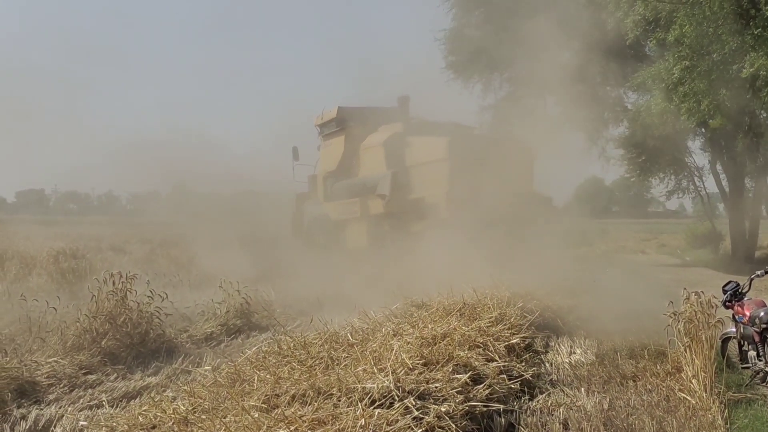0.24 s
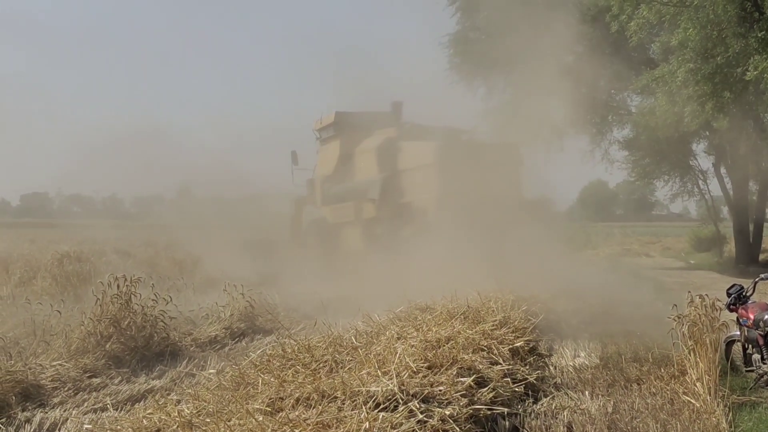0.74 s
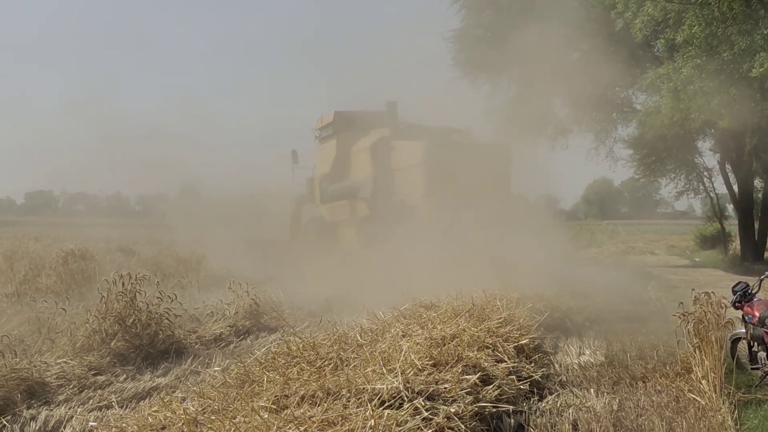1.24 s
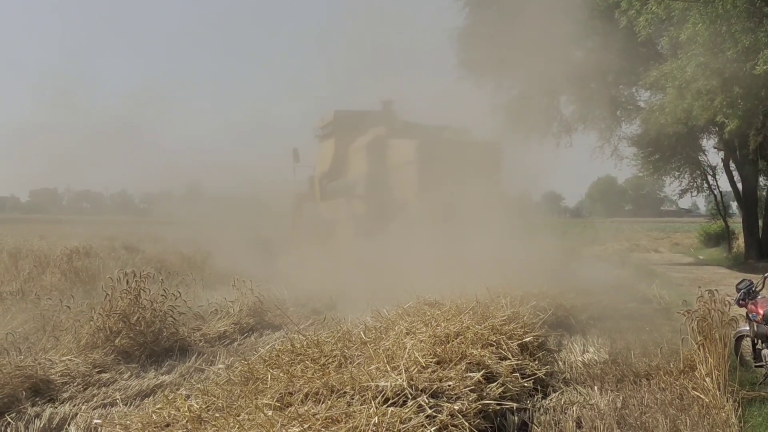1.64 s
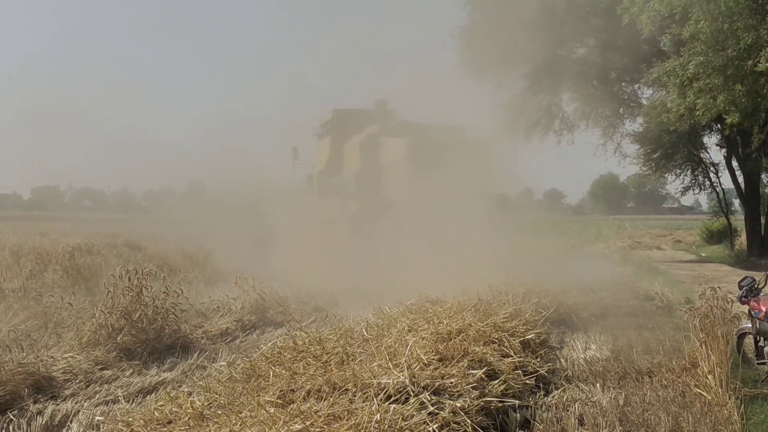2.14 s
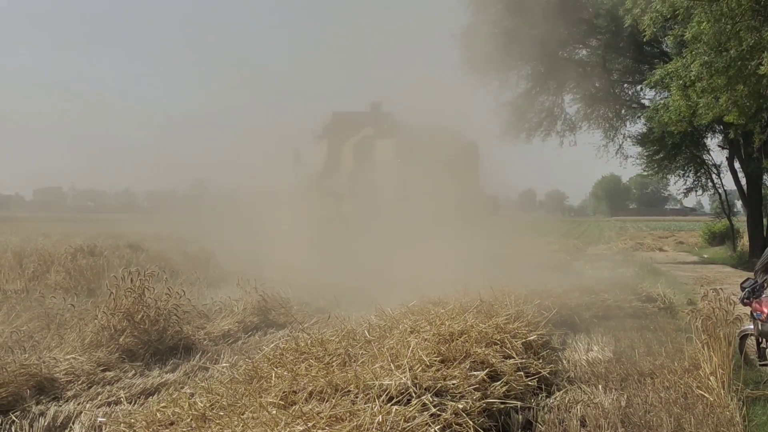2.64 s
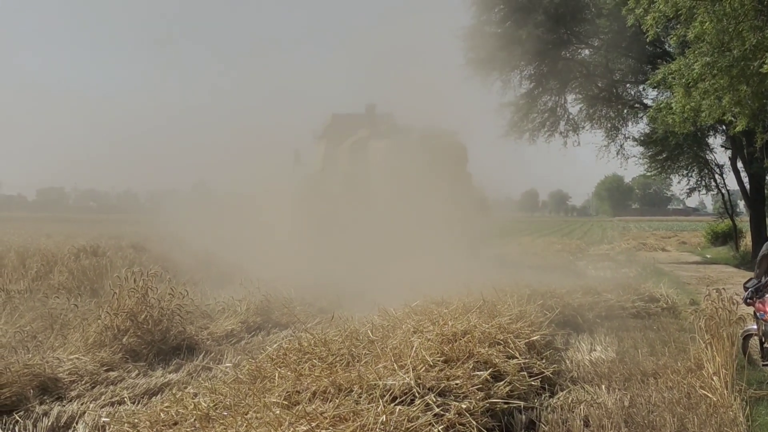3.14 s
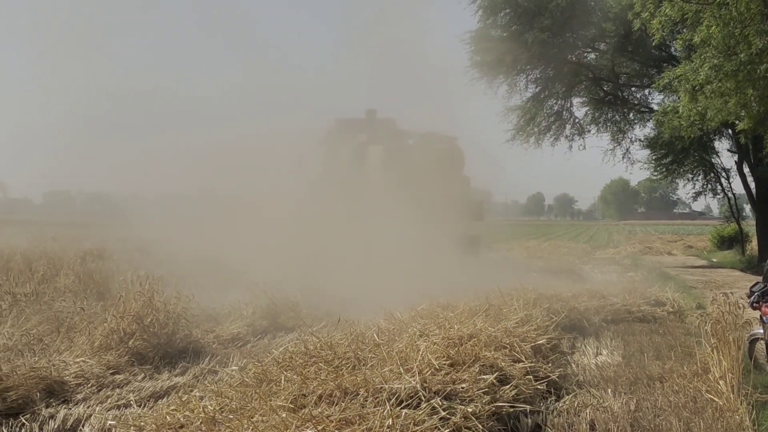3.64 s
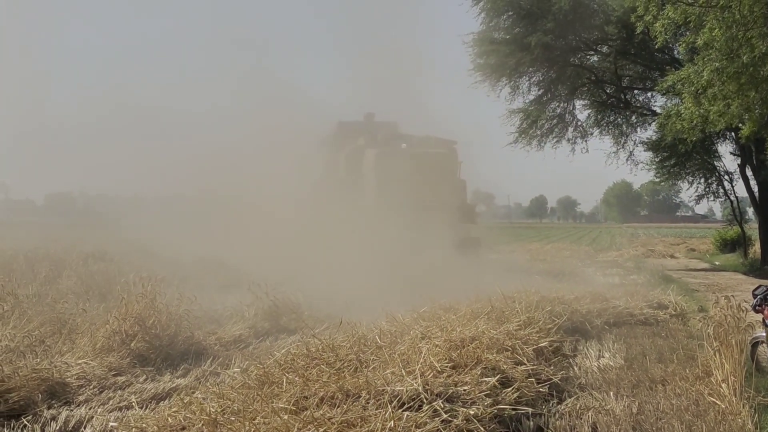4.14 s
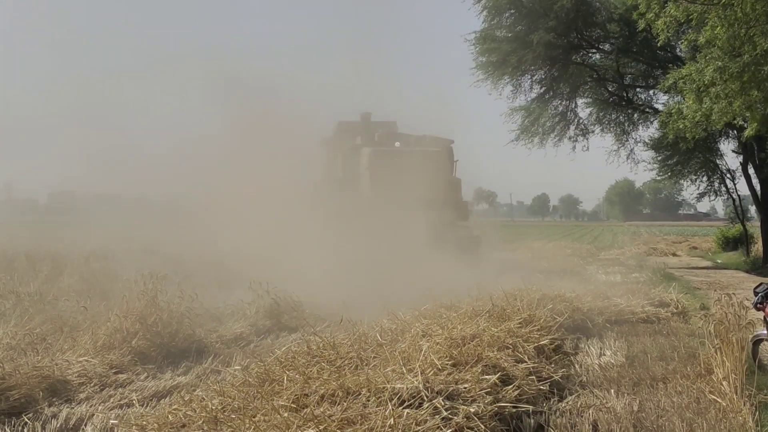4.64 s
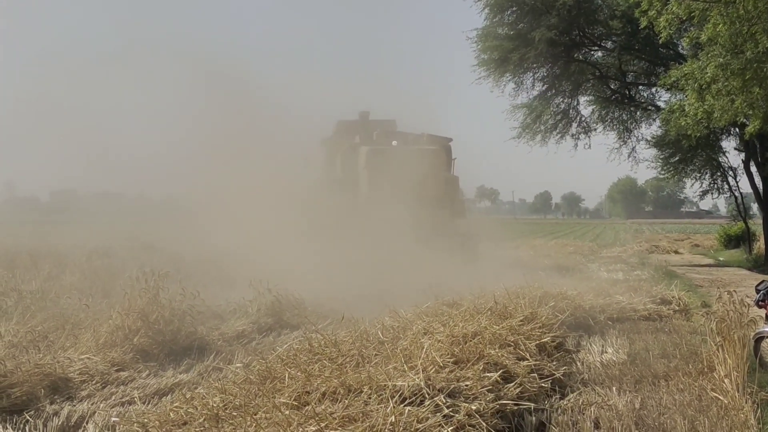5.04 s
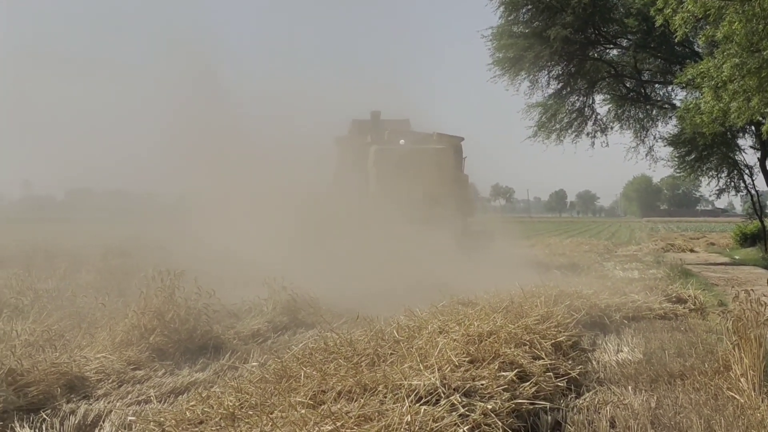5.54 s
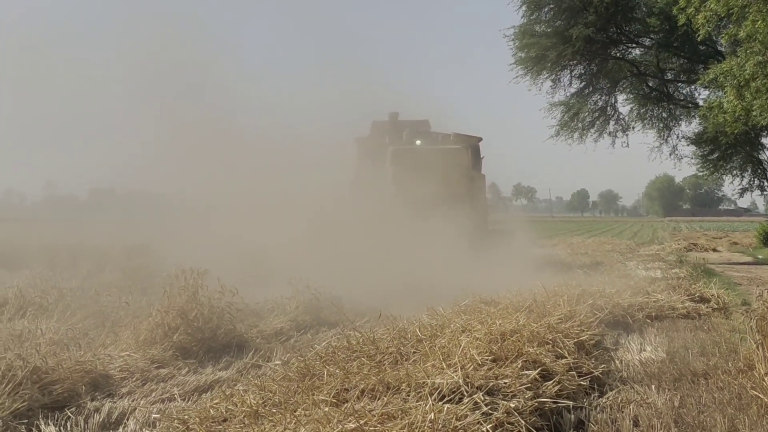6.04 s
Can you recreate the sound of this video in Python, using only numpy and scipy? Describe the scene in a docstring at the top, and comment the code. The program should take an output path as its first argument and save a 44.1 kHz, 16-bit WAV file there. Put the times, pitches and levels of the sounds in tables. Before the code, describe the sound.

A combine harvester works at moderate distance, heard by a stereo microphone in the open. The engine's fast, even firing purrs low and pulses slowly in strength, with knocking casing, rattling panels and a hard raspy edge. The thresher's deep drone rises and sinks over rumbling air. High whistles and chirps are strongest early and return weaker later. Fine dry straw hiss continues throughout, and everything fades gently as the machine moves off.

```python
"""A six-cylinder diesel combine harvester hums and clatters slowly away across a dry wheat field.
Its firing note beats against a near tone of the machinery; noise bursts ring the block, casing and panels,
and a thin whistle pulses with the firings. The threshing gear drones on its own shaft, over a rumble
of air and a hiss of straw, both filtered noise. A breeze and two light gusts brush the microphone."""
import sys
import numpy as np
from scipy import signal
from scipy.fft import rfft, irfft, next_fast_len
from scipy.io import wavfile
from scipy.ndimage import map_coordinates

SR = 44100
rng = np.random.default_rng(int(sys.argv[2]) if len(sys.argv) > 2 else 0)


def materialize(psi):
    """Save the field psi as 16-bit PCM at rate SR to the path in sys.argv[1].

    A 1-D psi becomes a single channel; in a 2-D psi each row is a channel.
    """
    bounded = np.clip(np.atleast_2d(psi).T, -1, 1)
    quanta = np.round(bounded * 32767).astype(np.int16)
    wavfile.write(sys.argv[1], SR, quanta)


N = 277389
T = np.arange(N) / SR
SIZE = next_fast_len(N, real=True)

CYCLE_HZ, CYCLE_OFFSET_TURNS = 17.63, -0.158  # nominal four-stroke rate, and where the count begins
# The engine sags under load, picks up and settles: start_s, cycle_hz (four-stroke cycles a second)
ENGINE_SPEED = [(0, 17.63), (.7, 17.62), (1.6, 17.57), (2.4, 17.57), (3.7, 17.745), (4.4, 17.63),
                (5.2, 17.55), (6.29, 17.62)]


def engine_cycle():
    """Four-stroke cycles run so far: the integral of the engine speed, with a slight unsteadiness."""
    cycle_hz = np.interp(T, *np.transpose(ENGINE_SPEED))
    return CYCLE_OFFSET_TURNS + np.cumsum(cycle_hz) / SR + 0.0014 * walk(2.84)


# Strength of each cylinder against the others, in firing order: level_db
CYLINDERS = [-10, -9, -6.5, -8.5, -6, -7.5]


def firings(cycle, sharp, scatter_db, lean=0.58):
    """One puff a firing, quick to rise and slower to die; each cylinder has its own strength."""
    place = cycle * len(CYLINDERS)
    k = np.round(place).astype(int)
    scatter = scatter_db * np.tanh(rng.standard_normal(1024))
    size_db = np.take(CYLINDERS, k, mode="wrap") + scatter[k]
    angle = 2 * np.pi * place
    return unit(undb(size_db) * np.exp(sharp * np.cos(angle + lean * (1 + np.cos(angle)))))


NOTE_DB = -21  # firing note, before its easing-in, its beat and the distance
NOTE_EASE_DB, NOTE_EASE_S = -4.5, 0.6  # softer at first, firming up as the engine takes the load
BEAT_DB = -7  # near tone, against the firing note
LOPE_ORDER, LOPE_DB, LOPE_FADE_DB_PER_S = 9, -33.5, 0.4  # multiple of the cycle, rms at the start
# Lulls in the slow beat of the firing note: lull_s
LULLS = [-.3, .58, 2.09, 3.9, 5.44, 7.1]
# Engine hum on multiples of the four-stroke cycle: order (multiple), level_db (rms)
ENGINE_ORDERS = [(7, -41), (11, -46.5), (12, -47), (13, -60), (25, -50.5), (26, -51.5), (27, -51),
                 (33, -65), (46, -59.5), (50, -51), (51, -47.5), (63, -60.5), (87, -59)]


def exhaust(cycle):
    """The firing note beats with a near tone of the machinery; uneven cylinders add a lope and side orders."""
    beat_turns = np.interp(T, LULLS, np.arange(len(LULLS)))
    beat = 1 - undb(BEAT_DB) * np.exp(-2j * np.pi * beat_turns)
    note = -np.sqrt(2) * np.real(beat * np.exp(2j * np.pi * len(CYLINDERS) * cycle))
    ease_db = NOTE_EASE_DB * np.exp(-T / NOTE_EASE_S)
    note = note * undb(NOTE_DB + ease_db + distance_db() + 0.07 * walk(5.7))
    lope_db = LOPE_DB - LOPE_FADE_DB_PER_S * T
    lope = tone(LOPE_ORDER * cycle + 0.1 * walk(6), lope_db, waver_db=4.0)
    orders = sum(tone(round(k) * cycle + 0.08 * walk(9), db, waver_db=2.0) for k, db in ENGINE_ORDERS)
    return note + lope + orders


def knocking(cycle, repeat):
    """A jumble of knocks, a share of which comes back on every engine cycle."""
    count = int(SR / CYCLE_HZ)
    pattern = map_coordinates(rng.standard_normal(count), [cycle % 1 * count], order=3, mode="grid-wrap")
    repeat = np.clip(repeat, 0, 1)
    return np.sqrt(repeat) * pattern + np.sqrt(1 - repeat) * rng.standard_normal(N)


CLATTER_DB = -26.5  # before the shaking and the distance
# Tone of the block and panels: pitch_hz, level_db (relative)
BODY = [(100, -44), (230, -9), (330, -8.5), (460, -3), (570, -2.5), (650, -8), (765, 0), (900, -6.5),
        (1010, -12), (1180, -7), (1450, -12.5), (1850, -17.5), (2300, -19), (6000, -65)]


def clatter(cycle, shaft):
    """Knocks ring the block and panels, harder at each firing and each turn of the drum."""
    knocks = spread(knocking(cycle, repeat=0.21))
    body = unit(colour(knocks, BODY)) * undb(CLATTER_DB + 0.5 * walk(9))
    firing_shake = 0.5 + 0.17 * firings(cycle, sharp=0.5, scatter_db=4.5)
    shake = firing_shake * throb(shaft, sharp=0.067, scatter_db=1.05)
    return (body + guard_plate(cycle)) * shake * undb(distance_db())


GUARD_HZ, GUARD_WIDTH_HZ = 1120, 240
GUARD_DB, GUARD_PEAK_S, GUARD_LENGTH_S = -39.5, 1.5, 1.4  # level before the shaking and the distance


def guard_plate(cycle):
    """A guard plate buzzes for a while: knocks through one resonance that wanders in pitch."""
    buzz = ring(knocking(cycle, repeat=0.33), GUARD_HZ + 25 * walk(2), GUARD_WIDTH_HZ)
    return buzz * undb(GUARD_DB) * swell(GUARD_PEAK_S, GUARD_LENGTH_S)


BOOM_HZ, BOOM_WIDTH_HZ, BOOM_DB = 781.4, 105, -37.5
BOOM_HOLD_S, BOOM_FADE_DB_PER_S = 2.1, 1.9  # holds its level, then fades


def boom(cycle, shaft):
    """The casing growls with the engine and throbs with the drum; its ring wanders a little in pitch."""
    knocks = knocking(cycle, repeat=0.54) * firings(cycle, sharp=0.34, scatter_db=1.0)
    knocks = knocks * throb(shaft, sharp=0.48, scatter_db=1.0)
    level_db = BOOM_DB - BOOM_FADE_DB_PER_S * np.maximum(T - BOOM_HOLD_S, 0)
    return ring(knocks, BOOM_HZ + 14 * walk(3), BOOM_WIDTH_HZ) * undb(level_db)


# The hardest knocks on the casing: start_s (before the lead), level_db (peak, before the gain), pitch_hz
CLONKS = [(0.332, -16, 824), (0.497, -24, 719), (1.544, -17, 754), (1.746, -16, 778), (2.823, -20, 856),
          (2.88, -13, 789), (3.043, -19, 837), (3.855, -21, 762), (4.354, -31, 756), (4.583, -21, 775),
          (4.824, -11.5, 797), (5.254, -16, 756)]


def clonks():
    """Single harder knocks stand out of the casing's growl as short pitched bursts."""
    return pings(CLONKS, rise_s=0.0047, lead_s=0.0022, gain_db=-9.5)


RASP_DB = -33.5  # at the starting distance
# Tone of the hard upper edge: pitch_hz, level_db (relative)
RASP = [(600, -50), (1500, -37), (1950, -8), (2120, -6.5), (2520, -4.5), (2900, -2.5), (3150, -1.5),
        (3700, 1.5), (4100, -7.5), (4700, -20.5), (5800, -33), (14000, -63)]


def rasp(cycle):
    """The hard upper edge of the diesel knock: noise pulsed by the firings, loudest on strong cylinders."""
    puffs = 6.5 + 1.4 * firings(cycle, sharp=1.1, scatter_db=12.0)
    return unit(colour(air() * puffs, RASP)) * undb(RASP_DB + distance_db() + 0.5 * walk(5.9))


# Sheet-metal resonances: pitch_hz, width_hz, level_db (between the bouts)
PANEL_MODES = [(2374, 180, -51.5), (3453, 123, -52.5), (3760, 170, -57), (4000, 110, -66)]
# Bouts of harder rattling: peak_s, length_s, then level_db of each of the four resonances
RATTLES = [(0.2, 0.42, -42.5, -57, -36.5, -60), (1.65, 1.07, -48, -36.5, -48, -44),
           (4.5, 2, -43, -43, -52, -48.5)]


def panels(cycle):
    """Loose panels sing in bouts: firing-pulsed noise through narrow sheet-metal resonances."""
    out = 0
    for k, (hz, width_hz, db) in enumerate(PANEL_MODES):
        sing = undb(db)
        for peak_s, length_s, *modes_db in RATTLES:
            sing = np.hypot(sing, undb(modes_db[k]) * swell(peak_s, length_s))
        taps = rng.standard_normal(N) * firings(cycle, sharp=0.58, scatter_db=2.3)
        out = out + ring(taps, hz + 18 * walk(3), width_hz) * sing * undb(walk(16))
    return out


SPELL_ATTACK_S, SPELL_RELEASE_S, SPELL_SAG_DB_PER_S = 0.26, 0.21, 0.5
SPELL_SAG_HZ, SPELL_SETTLE_S, SPELL_WAVER_HZ = 214, 0.71, 18  # slide down, its time constant, waver
RUSH_DB = 0  # rush of gas against the clear core
# Spells of whistling: start_s, length_s, level_db (core, before swell and sag), pitch_hz (at the start)
SPELLS = [(-.25, 0.47, -36, 3470), (.08, 1.73, -34, 3832), (3.6, 1.23, -42, 3786), (5.705, 0.23, -39, 3570)]


def whistle(cycle):
    """Gas squeezes through a narrow gap at each firing and whistles in spells, each sliding down as it tires."""
    out = 0
    for start_s, length_s, db, start_hz in SPELLS:
        age = np.maximum(T - start_s, 0)
        attack = np.minimum(age / SPELL_ATTACK_S, 1)
        release = np.exp(-np.maximum(age - length_s, 0) / SPELL_RELEASE_S)
        slide_hz = SPELL_SAG_HZ * (1 - np.exp(-age / SPELL_SETTLE_S))
        hz = start_hz - slide_hz + SPELL_WAVER_HZ * walk(9)
        puffs = 0.5 + firings(cycle, sharp=1.0, scatter_db=4.0)
        rush = ring(rng.standard_normal(N) * puffs, hz, width_hz=260)
        # the clear core slips out of step from puff to puff
        core = unit(puffs * np.sin(2 * np.pi * (np.cumsum(hz) / SR + 0.23 * walk(70))))
        level = undb(db - SPELL_SAG_DB_PER_S * age)
        out = out + (undb(RUSH_DB) * rush + core) * attack * release * level
    return out


# The sharpest chirps of the whistle: start_s (before the lead), level_db (peak, before the gain), pitch_hz
CHIRPS = [(0.2774, -23, 3690), (0.3296, -21, 3710), (0.385, -21, 3760), (0.5005, -21, 3700),
          (0.5566, -26, 3660), (0.7063, -25, 3770), (0.7267, -21.5, 3530), (0.7831, -19.5, 3740),
          (0.8964, -23, 3540), (0.9343, -24, 3680), (1.3224, -27, 3540), (1.4491, -26, 3570),
          (1.7464, -24, 3680), (1.8073, -22, 3660), (4.1859, -36, 3650), (4.2228, -32, 3640),
          (4.2991, -25, 3660), (4.3565, -29, 3580), (4.5835, -29, 3460), (4.6404, -22.5, 3580),
          (4.6504, -30, 3350), (4.6972, -28, 3640), (4.7536, -26, 3520), (5.0739, -27.5, 3470)]


def chirps():
    """Now and then a hard puff squeaks out above the whistle as a short pitched burst."""
    return pings(CHIRPS, rise_s=0.0026, lead_s=0.0012, gain_db=4.5)


SHAFT_HZ, SHAFT_AT_S = 35.52, 2.65  # speed, and when the shaft runs at it
SHAFT_OFFSET_TURNS, SHAFT_SAG_HZ_PER_S = 0.055, 0.0388


def drum_shaft():
    """Turns of the drum's shaft, which slowly loses speed in the crop and runs a little unevenly."""
    lost_turns = SHAFT_SAG_HZ_PER_S * (T - SHAFT_AT_S) ** 2 / 2
    uneven = 0.0027 * walk(5.1) + 0.0057 * walk(35)
    return SHAFT_OFFSET_TURNS + SHAFT_HZ * T - lost_turns + uneven


def throb(shaft, sharp, scatter_db):
    """One surge at each turn of the drum, each with its own strength."""
    scatter = scatter_db * np.tanh(rng.standard_normal(1024))
    size_db = scatter[np.round(shaft).astype(int)]
    return unit(np.exp(sharp * np.cos(2 * np.pi * shaft)) * undb(size_db))


DRUM_NOTE_ORDER = 4  # multiple of the shaft speed
# The drum's main note rising and sinking: start_s, level_db (rms)
DRUM_LEVEL = [(0, -24), (1.2, -28), (2, -27), (3.1, -28), (3.7, -31.5), (4.3, -24), (4.75, -29),
              (5.2, -24.5), (5.45, -30.5), (5.8, -25.5), (6.29, -29)]
# Threshing drone on multiples of the shaft speed: order (multiple), level_db (rms)
DRUM_ORDERS = [(2, -43), (6, -35.5), (8, -40.5), (10, -51)]


def drum(shaft):
    """The threshing drum drones on multiples of its shaft speed, under a main note that rises and sinks."""
    level = undb(np.interp(T, *np.transpose(DRUM_LEVEL)))
    out = np.sqrt(2) * np.cos(2 * np.pi * DRUM_NOTE_ORDER * shaft) * level
    for k, db in DRUM_ORDERS:
        line = tone(round(k) * shaft + 0.04 * walk(14), db, waver_db=1.9)
        out = out + line * undb(1.4 * walk(24))
    return out


# Belt-driven shafts and fans: pitch_hz, level_db (rms)
BELT_TONES = [(42.3, -56.5), (126.2, -42), (165.5, -44.5)]


def belts():
    """Belt-driven shafts and fans hum at steady pitches, wavering in level."""
    return sum(tone(hz * T + 0.034 * walk(2.28), db, waver_db=4.0) for hz, db in BELT_TONES)


# Tone of the churned air: pitch_hz, level_db (relative)
RUMBLE = [(20, -27), (48, -22), (70, -8), (92, -4), (108, -3), (127, 5), (142, -1), (160, 2), (178, -0.5),
          (215, -1), (260, -10.5), (330, -17), (450, -48)]
# Level of the rumble: start_s, level_db (rms)
RUMBLE_LEVEL = [(0, -27), (1.2, -26.7), (2.1, -28), (3.0, -29), (3.7, -28), (4.3, -30.5), (5.1, -29.7),
                (6.29, -31.5)]


def rumble():
    """The air that drum and fans churn: low filtered noise."""
    return unit(colour(air(), RUMBLE)) * undb(np.interp(T, *np.transpose(RUMBLE_LEVEL)))


STRAW_DB = -44  # at the start
THINS_S, THINNING_S, THIN_DB = 4.9, 0.17, 2.5  # the stream thins once: when, over how long, by how much
STRAW_FADE = 0.22  # share of the machine's fading, in dB, that the straw follows
# Tone of the straw: pitch_hz, level_db (relative)
STRAW = [(1000, -21), (3500, 7.5), (5000, 2), (5900, -2.5), (6900, 7), (7700, 5), (8500, 8), (9400, 4),
         (10600, -4.5), (13000, -3.5), (14500, -5.5), (15500, -27)]


def straw():
    """Dry stalks and chaff: a fine, restless hiss with sparse crackles, which thins out near the end."""
    size = undb(3.5 * np.minimum(rng.exponential(size=N), 3.5))
    struck = rng.random(N) < 100 / SR  # about 100 crackles a second
    crackle = struck * size * rng.standard_normal((2, N))
    stalks = air() + undb(-15) * unit(crackle)
    flow_db = STRAW_DB - THIN_DB * np.clip((T - THINS_S) / THINNING_S, 0, 1)
    return unit(colour(stalks, STRAW)) * undb(flow_db + STRAW_FADE * distance_db() + 0.88 * walk(21.8))


BREEZE_DB = -41
# Gusts on the microphone: peak_s, length_s, level_db
GUSTS = [(3.577, 0.4, -29), (4.624, .14, -40)]
# Tone of the wind: pitch_hz, level_db (relative)
WIND = [(20, -30), (50, -26), (85, -2), (140, -3), (200, -12.5), (300, -16.5), (500, -29), (900, -63),
        (2500, -75)]


def wind():
    """A light breeze and two gusts, each swelling and sinking, buffet each port with its own noise."""
    force = undb(BREEZE_DB + 3.2 * walk(4.0))
    for peak_s, length_s, db in GUSTS:
        force = np.hypot(force, undb(db) * swell(peak_s, length_s))
    return unit(colour(rng.standard_normal((2, N)), WIND)) * force * undb(1.6 * walk(3.8))


START_M, SPEED_M_S = 18, 1.47  # starting distance, and a walking pace


def distance_db():
    """Loss of level as the machine draws away: 6 dB for each doubling of distance."""
    return -20 * np.log10(1 + SPEED_M_S * T / START_M)


# Likeness of the two ports: pitch_hz, share (of the power common to both, 0 to 1)
COMMON = [(60, 1), (280, 0.99), (750, 0.99), (1150, 0.96), (1600, 0.81), (3000, 0.39), (4200, 0.46),
          (5200, 0.091), (8000, 0.14), (14000, .05)]


def spread(common):
    """Two ports hear the same bass and mostly unrelated treble."""
    share = np.clip(per_bin(COMMON), 0, 1)
    own = rfft(rng.standard_normal((2, SIZE)))
    return irfft(np.sqrt(share) * rfft(common, SIZE) + np.sqrt(1 - share) * own, SIZE)[..., :N]


def air():
    """White noise as it reaches the two ports."""
    return spread(rng.standard_normal(N))


def tone(turns, db, waver_db):
    """One line of a rotating part, wavering on its way through the open air."""
    level = np.sqrt(2) * undb(db + waver_db * walk(5))
    return level * np.sin(2 * np.pi * (turns + rng.random()))


def ring(x, hz, width_hz):
    """A resonance with steep skirts whose centre may move: shift down, low-pass, shift back up."""
    lowpass = signal.butter(2, width_hz / 2, fs=SR, output="sos")
    low = signal.sosfilt(lowpass, x * np.exp(-2j * np.pi * np.mean(hz) * T))
    return unit(np.real(low * np.exp(2j * np.pi * np.cumsum(hz) / SR)))


def pings(rows, rise_s, lead_s, gain_db):
    """Short pitched bursts, quick to rise and slower to die: one a row, starting lead_s early."""
    out = 0
    for start_s, peak_db, hz in rows:
        age = np.clip((T - start_s + lead_s) / rise_s, 0, 20)
        burst = (age * np.exp(1 - age)) ** 2
        out = out + undb(peak_db + gain_db) * burst * np.sin(2 * np.pi * hz * T)
    return out


def swell(peak_s, length_s):
    """A smooth rise and fall around peak_s, 1 at the top."""
    return np.exp(-2 * ((T - peak_s) / length_s) ** 2)


def walk(rate):
    """Smooth chance of spread about 1 that changes about rate times a second."""
    knots = rng.standard_normal(1024)
    return map_coordinates(knots, [T * rate], order=3, mode="wrap")


def undb(db):
    """Decibels to gain."""
    return 10 ** (np.asarray(db) / 20)


def unit(x):
    """Scale to rms 1."""
    return x / np.sqrt(np.mean(np.abs(x) ** 2))


def per_bin(points):
    """(Hz, value) points joined on a log-frequency axis."""
    hz, value = np.transpose(points)
    bins_hz = np.maximum(np.fft.rfftfreq(SIZE, 1 / SR), 1)
    return np.interp(np.log(bins_hz), np.log(hz), value)


def colour(x, points):
    """Filter by a (Hz, dB) spectrum."""
    return irfft(rfft(x, SIZE) * undb(per_bin(points)), SIZE)[..., :N]


def scene():
    """Engine, whistle, threshing gear, straw and wind, while the machine draws away."""
    cycle = engine_cycle()
    shaft = drum_shaft()
    engine = exhaust(cycle) + clatter(cycle, shaft) + boom(cycle, shaft) + clonks()
    edge = rasp(cycle) + panels(cycle) + whistle(cycle) + chirps()
    thresher = drum(shaft) + belts() + rumble()
    return engine + edge + thresher + straw() + wind()


TOP_HZ = 15200  # steep upper limit
# Response of the right port: pitch_hz, level_db (gain)
RIGHT_PORT = [(100, -0.5), (280, -0.5), (700, -0.7), (1300, -0.5), (1800, 3), (2400, -6), (3100, -9.5),
              (3700, -17), (4400, -6), (5600, 1.5), (6500, -2), (8400, -13), (10300, -6), (13000, -11)]


def record(dry):
    """The left port hears one sample later, the right one is mostly duller; the top is cut steeply."""
    ports = np.array([np.roll(dry[0], 1), colour(dry[1], RIGHT_PORT)])
    return signal.sosfilt(signal.ellip(10, 0.1, 80, TOP_HZ, fs=SR, output="sos"), ports)


dry = scene()
out = record(dry)
materialize(out)
```